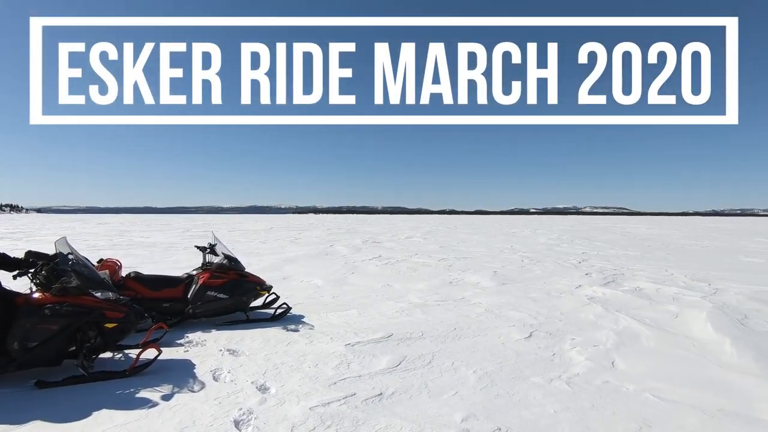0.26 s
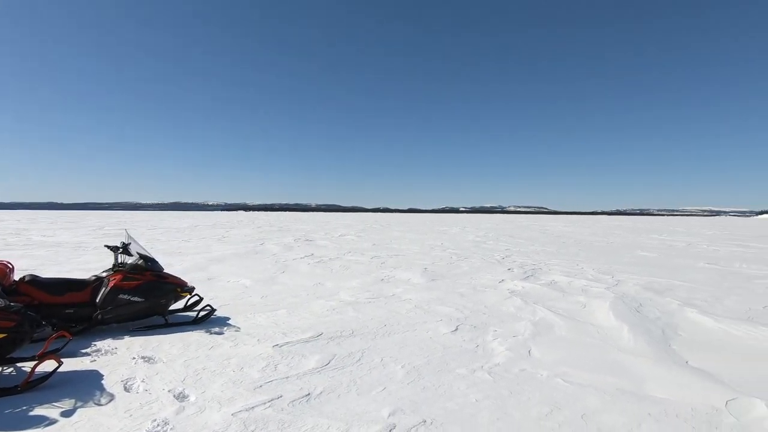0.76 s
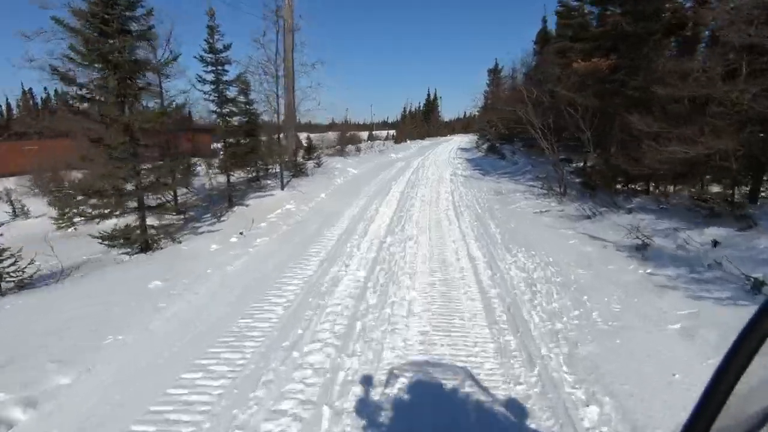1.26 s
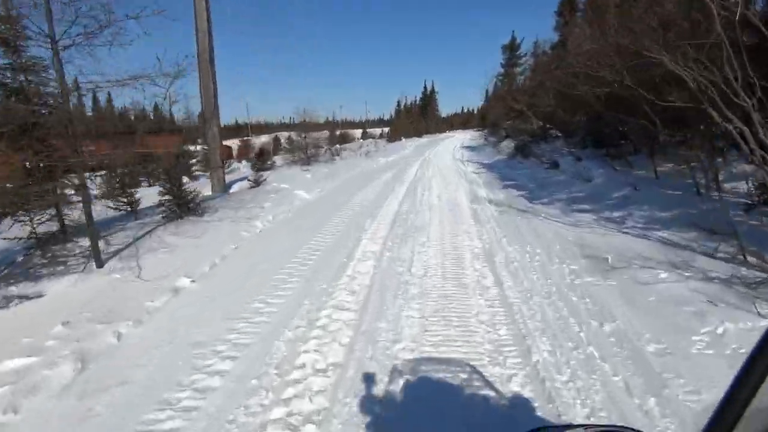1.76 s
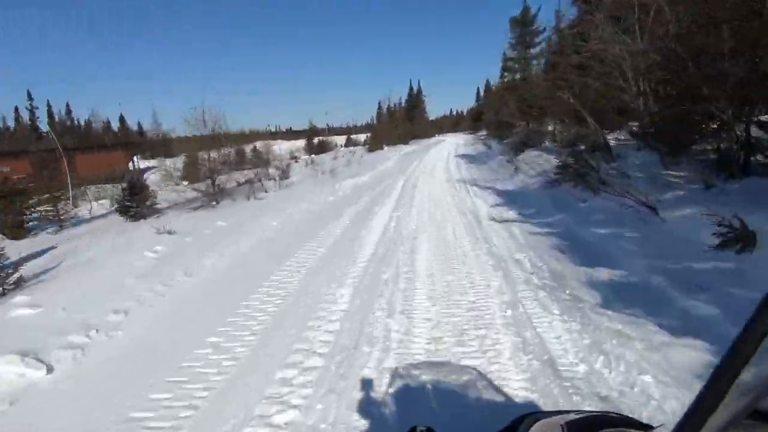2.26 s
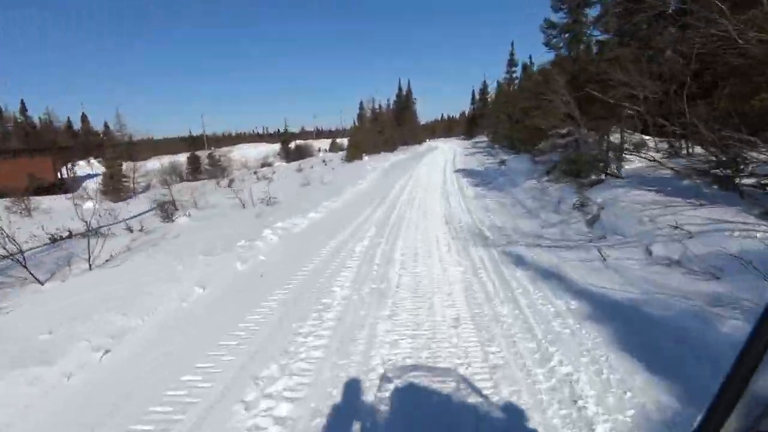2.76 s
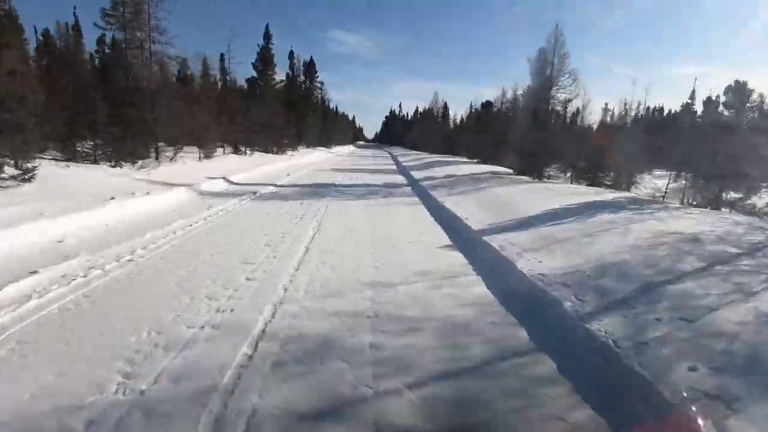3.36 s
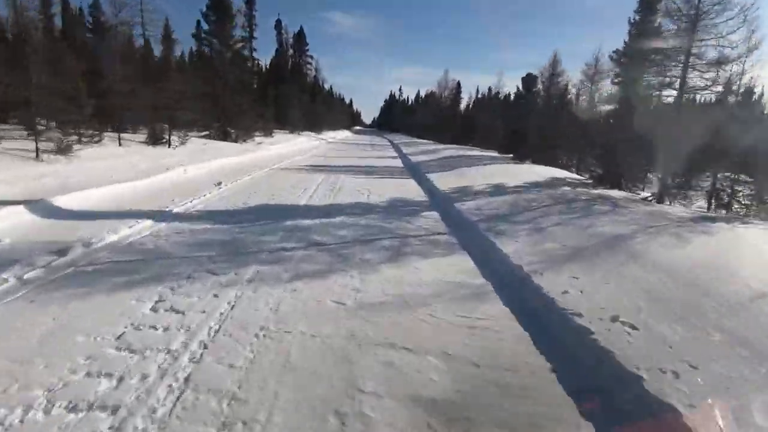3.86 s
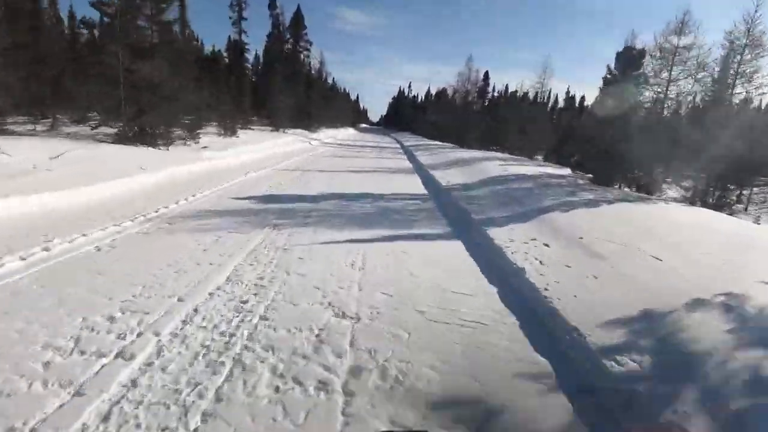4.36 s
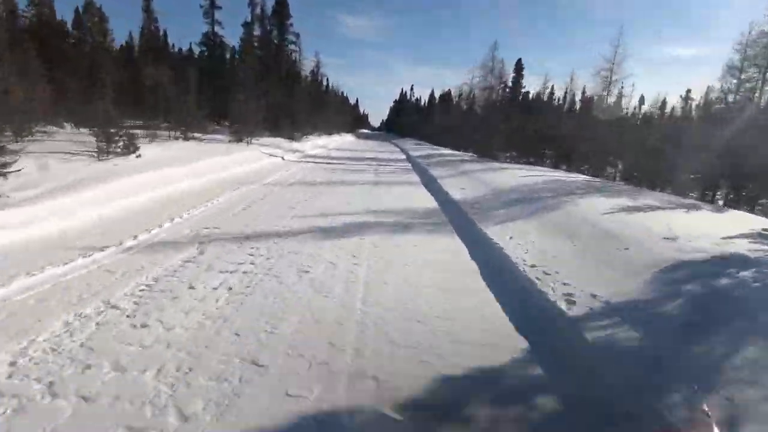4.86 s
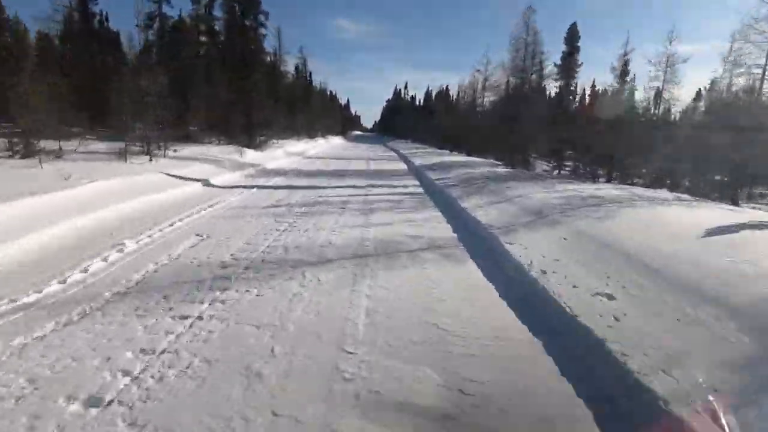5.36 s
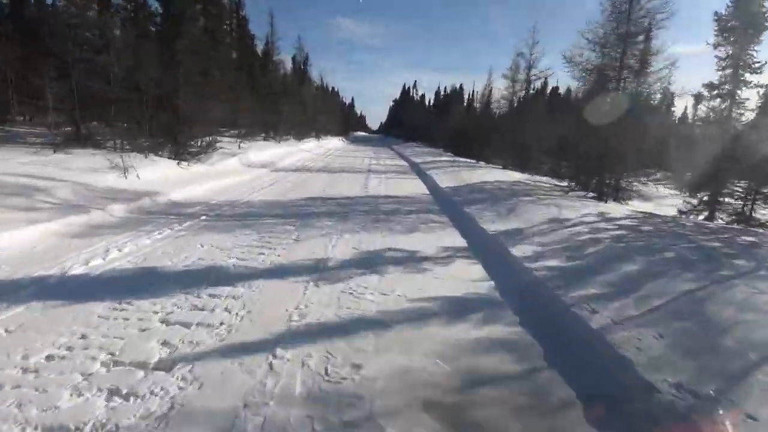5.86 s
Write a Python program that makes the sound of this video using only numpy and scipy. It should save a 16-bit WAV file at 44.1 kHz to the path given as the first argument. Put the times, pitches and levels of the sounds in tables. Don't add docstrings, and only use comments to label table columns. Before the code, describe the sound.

Snowmobiles idle with a soft puttering, cut off; then gusty wind buffets the microphone over a faint engine, before a loud full-speed engine drone with whine.

```python
import sys
import numpy as np
from scipy import signal
from scipy.io import wavfile
from scipy.ndimage import uniform_filter1d

SR = 44100
rng = np.random.default_rng(int(sys.argv[2]) if len(sys.argv) > 2 else 0)


def transcribe(signal):
    frames = np.atleast_2d(signal).T
    limited = np.clip(frames, -1, 1)
    pcm = np.round(limited * 32767).astype(np.int16)
    wavfile.write(sys.argv[1], SR, pcm)


def invert_db(x):
    u = np.asarray(x, float) / 20
    return 10 ** u


N = 269010
T = np.arange(N) / SR
CUT_S, FADE_S, JOIN_S = 1.0008, 1.08, 3.1672


def evened(x):
    return x / np.sqrt(np.mean(x ** 2) + 1e-20)


def curves(rows):
    s, *columns = np.transpose(rows)
    return [np.interp(T, s, c) for c in columns]


def above(x, hz):
    return signal.sosfiltfilt(signal.butter(4, hz, "high", fs=SR, output="sos"), x)


def steadied(x):
    flat = x / np.sqrt(uniform_filter1d(uniform_filter1d(x ** 2, size=150), size=150) + 1e-20)
    return flat - above(flat, 6600)


def wander(hz):
    lowpass = signal.butter(2, hz, fs=SR / 16, output="sos")
    coarse = signal.sosfilt(lowpass, rng.standard_normal(N // 16 + 2))
    return np.interp(np.arange(N) / 16, np.arange(len(coarse)), evened(coarse))


def noise(points, lo_hz, hi_hz, size=512, patchy_db=-4.5, flicker_db=7.0):
    hz, frames = np.fft.rfftfreq(size, 1 / SR), 4 * N // size + 5
    f, db = np.transpose(points)
    shape = invert_db(np.interp(np.log(hz + 1), np.log(f + 1), db))
    a, b, patch = rng.standard_normal((frames, len(hz), 3)).T
    patch = evened(uniform_filter1d(uniform_filter1d(patch, size=7, axis=0), size=9, axis=1))
    flicker = evened(uniform_filter1d(rng.standard_normal(frames), size=3))
    z = (a + 1j * b) * shape[:, None] * invert_db(patchy_db * patch + flicker_db * flicker)
    in_band = (hz >= lo_hz) & (hz <= hi_hz)
    share = np.sum(shape[in_band] ** 2) / np.sum(shape ** 2)
    return evened(signal.istft(z, nperseg=size, noverlap=3 * size // 4)[1][:N]) / np.sqrt(share)


def tone(hz, db, rough_db, rough_hz):
    turns = np.cumsum(hz * np.ones(N)) / SR + rng.random() + 0.018 * rough_db * wander(rough_hz)
    return np.sqrt(2) * invert_db(db + rough_db * wander(rough_hz)) * np.sin(2 * np.pi * turns)


def bursts(rows, rise):
    power = np.zeros(N)
    for s, db, length in rows:
        t = np.arange(0, 4 * length + rise, 1 / SR)
        puff = invert_db(db) * np.minimum(t / rise, 1) * np.exp(-(np.maximum(t - rise, 0) / length) ** 2)
        part = power[round(s * SR):][:len(t)]
        part += puff[:len(part)] ** 2
    return np.sqrt(power)


def whistle(t0, t1, hz0, hz1, width, db):
    u = np.clip((T - t0) / (t1 - t0), 0, 1)
    turns = 2 * np.pi * np.cumsum(hz0 + u * (hz1 - hz0)) / SR
    band = wander(width / 2) * np.cos(turns) + wander(width / 2) * np.sin(turns)
    swell = (np.abs(np.sin(np.pi * u ** 0.6)) + 1e-12) ** 0.46
    edges = np.clip((T - t0) / 0.0072, 0, 1) * np.clip((t1 - T) / .006, 0, 1)
    return invert_db(db) * swell * edges * band


def speeding_up(early, late):
    return early + np.clip((T - 3.9) / 2.0, 0, 1) * (late - early)


# time in seconds, engine cycles per second in Hz, load in dB.
ENGINE = [(3.17, 38.3, -9), (3.45, 38.5, 2), (4.0, 38.2, -3), (4.5, 38.5, 3), (4.8, 39.6, 0.5),
          (5.4, 39.1, 0.5), (5.75, 38.8, -0.5), (6.1, 37.8, -10.5)]
ORDER = [8, 9, 12, 16, 20, 21, 22, 23, 24, 26, 28, 30, 34, 37, 41, 48]
EARLY_DB = [-42.5, -48.5, -38.5, -50, -42, -51, -48, -37.5, -36.5, -52.5, -48.5, -58, -51, -39.5, -48.5,
            -51]
LATE_DB = [-55.5, -42.5, -42.5, -54, -40.5, -38.5, -39, -45.5, -58.5, -51, -51, -46.5, -68, -60, -51, -47]


def fast_engine(hz, load_db):
    engine = tone(2 * hz, speeding_up(-22.5, -20.5) + load_db, 1.55, 10)
    engine += tone(3 * hz, speeding_up(-20, -27.5) + load_db, 3.65, 8.6)
    for k, early, late in zip(ORDER, EARLY_DB, LATE_DB):
        engine += tone(k * hz, speeding_up(early, late), 2.75, 5.8)
    return engine


TRACK_ORDER = [1, 2, 3, 4, 6, 8]
# early level in dB, late level in dB.
TRACK_DB = [(-37.5, -32), (-33.5, -21.5), (-36, -25), (-61, -36), (-29, -35), (-35, -42)]


def track_drone(whine_hz):
    track_hz = whine_hz / 31.25
    levels = zip(TRACK_ORDER, TRACK_DB)
    return sum(tone(k * track_hz, speeding_up(early, late), 1.5, 11.0) for k, (early, late) in levels)


# time in seconds, whine in Hz, tension as level in dB.
WHINE = [(3.17, 1329, -32.5), (3.95, 1336, -43), (4.16, 1345, -29), (4.7, 1361, -32), (5.4, 1392, -29.5),
         (6.1, 1415, -29)]


def chain_whine(whine_hz, whine_db):
    overtone = tone(3 * whine_hz, whine_db - 33, 1.5, 15)
    return tone(whine_hz, whine_db, 0.72, 33) + np.clip((T - 5.75) / .1, 0, 1) * overtone


# frequency in Hz, level in dB per Hz.
RIDE = [(12, -45.5), (20, -42), (82, -4), (102, -1), (170, -10.5), (266, -5.5), (399, -16), (883, -15),
        (1250, -18), (1380, -15.5), (1530, -24.5), (1920, -25.5), (2600, -48), (3380, -68.5), (5720, -120)]


def body_roar(hz, start):
    throb = 1 + 0.13 * np.cos(2 * np.pi * np.cumsum(4 * hz) / SR)
    air = noise(RIDE, 450, 1250, size=1024, patchy_db=0.15, flicker_db=-0.8)
    return invert_db(-28.5 + 4.5 * start) * throb * air


# frequency in Hz, level in dB per Hz.
SPRAY = [(2000, -15.5), (3400, -13.5), (4300, -4.5), (5300, 3.5), (6300, -3), (7100, -16), (8700, -19.5),
         (9300, -27.5), (10800, -32), (11300, -58), (11800, -34.5), (12400, -35.5), (14000, -42),
         (15500, -52)]


def snow_spray(start):
    low = [p for p in SPRAY if p[0] < 11500]
    high = [p for p in SPRAY if p[0] > 11000]
    spray = noise(low + [(12000, -86)], 3500, 7000, size=512, patchy_db=-1.4, flicker_db=0.95)
    fizz = noise([(10900, -84)] + high, 11500, 15000, size=512, patchy_db=-1.0, flicker_db=2.5)
    packed = np.clip(np.minimum(T - 4.6, 5.55 - T) / .15 + .5, 0, 1)
    return invert_db(-45.5) * spray + invert_db(-74.5 + 10 * start - 7.5 * packed) * fizz


# time in seconds, peak level in dB.
TICKS = [(3.3777, -38), (3.458, -39), (3.694, -41), (3.8472, -42), (4.0612, -38), (4.137, -43),
         (4.2034, -37), (4.2784, -40), (4.345, -40), (4.4847, -36), (4.5497, -40), (4.6183, -36),
         (4.7706, -38), (5.0614, -40), (5.2996, -47), (5.652, -43), (5.8222, -39), (5.887, -38)]
# frequency in Hz, level in dB per Hz.
GRAIN = [(1200, -51), (2300, 0.5), (4000, -6.5), (6500, -18.5), (9000, -60.5)]


def ice_ticks():
    grain = steadied(noise(GRAIN, 2500, 3900, size=256))
    return bursts([(s, db - 4, .0028) for s, db in TICKS], .0018) * grain


# start and end in seconds, start and end pitch in Hz, width in Hz.
MOAN = (4.95, 5.15, 540, 530, 90)


def fast_ride():
    hz, load_db = curves(ENGINE)
    whine_hz, whine_db = curves(WHINE)
    start = np.exp(-np.maximum(T - JOIN_S, 0) / 0.4)
    machine = fast_engine(hz, load_db) + track_drone(whine_hz) + chain_whine(whine_hz, whine_db)
    return machine + body_roar(hz, start) + snow_spray(start) + ice_ticks() + whistle(*MOAN, -31.5)


# start in seconds, length in seconds, strength in dB over the lull, drift in dB.
GUSTS = [(1.148, .12, 3, 5.5), (1.281, 0.16, 12, -9), (1.432, 0.12, 12, -0.5), (1.546, 0.234, 9.5, -1.5),
         (1.804, 0.052, 5, -2.5), (1.86, 0.094, 5.5, -2), (2.088, 0.17, 1.5, 1), (2.25, .07, 9, -0.5),
         (2.314, 0.087, 9, -3.5), (2.411, 0.051, 7, -1), (2.533, 0.056, 7, -2), (2.767, 0.055, 6, 0),
         (2.829, 0.072, 6.5, 0), (2.965, 0.086, 9, -4.5), (3.081, 0.076, 6, 4.5)]


def gusts():
    db = np.zeros(N)
    for s, length, first_db, change_db in GUSTS:
        edges = np.clip(np.minimum(T - s, s + length - T) / 0.039 + .5, 0, 1)
        db += edges * (first_db + change_db * np.clip((T - s) / length, 0, 1))
    return db


# time in seconds, pressure on the housing in dB.
AIRSPEED = [(1.15, -19), (1.2, -19.5), (1.73, -14), (1.98, -18), (2.53, -15.5), (2.73, -21.5),
            (3.15, -18.5), (3.17, -28)]
# frequency in Hz, level in dB per Hz.
BUFFET = [(12, -40), (20, -12), (43, 0), (97, 1), (178, -7), (274, -8), (304, -11.5), (370, -16),
          (411, -32), (450, -25.5), (580, -48), (990, -120)]


def buffeting(buffet_db, gust):
    buffet = invert_db(buffet_db) * noise(BUFFET, 25, 200, size=2048, patchy_db=1.7, flicker_db=1.2)
    rustle_db = 0.36 * uniform_filter1d(gust - buffet_db - 24.5, size=3000)
    return buffet + above(buffet, 190) * (invert_db(rustle_db) - 1)


# frequency in Hz, level in dB per Hz.
ROAR = [(240, -42), (400, 5.5), (415, -4), (504, 1), (822, -3.5), (895, -3.5), (2240, -13.5), (4110, -31.5),
        (5720, -42), (7390, -48), (9610, -76), (16300, -120)]


def wind_roar(gust):
    flicker = invert_db(0.3 * wander(30) + 2.15 * wander(120))
    roar = flicker * noise(ROAR, 450, 1800, size=256, patchy_db=1.5, flicker_db=-0.5)
    top = above(roar, 2430)
    return invert_db(gust - 36) * (roar - top) + invert_db(1.62 * gust - 63) * evened(top)


# time in seconds, peak in dB, brightness in dB, length in seconds.
SLAPS = [(1.142, -20.5, -34, 0.0049), (1.18, -15, -29, 0.0056), (1.231, -16.5, -24, 0.0075),
         (1.302, -20, -29, 0.0097), (1.441, -20, -22, 0.007), (1.525, -22, -22, 0.0036),
         (1.558, -14, -24, 0.007), (1.612, -15, -18.5, 0.007), (1.675, -23, -18, 0.007),
         (1.722, -13, -23, 0.0027), (1.775, -12, -21.5, 0.0061), (1.813, -27, -9, 0.0065),
         (1.901, -22, -14.5, 0.0047), (1.929, -29, -8, 0.007), (1.984, -18, -25, 0.0048),
         (2.2, -21, -18, 0.0035), (2.27, -14, -22, 0.0085), (2.31, -15.5, -21, 0.0061),
         (2.361, -14, -18, 0.0062), (2.394, -12, -22, 0.007), (2.484, -23.5, -14, 0.011),
         (2.529, -18.5, -17, 0.007), (2.618, -16, -15, 0.0084), (2.709, -24, -16, 0.007),
         (2.746, -32, -21, 0.007), (2.839, -29, -23, 0.0038), (2.99, -11, -35, 0.007),
         (3.069, -23, -15, 0.01), (3.104, -19, -23, 0.005), (3.13, -10.5, -24, 0.007)]


def eddy_slaps(gust):
    eddy = noise(ROAR, 700, 4000, size=256, patchy_db=1.5, flicker_db=-5.0)
    edge = above(eddy, 1870)
    spit = steadied(evened(edge) + 0.65 * evened(above(edge, 3300)))
    thump = steadied(above(eddy - edge, 610))
    slaps = bursts([(s - .002, db - 6, n) for s, db, _, n in SLAPS], 0.0049) * thump
    slaps += bursts([(s, db + bright_db - 1.0, 0.73 * n) for s, db, bright_db, n in SLAPS], 0.0018) * spit
    place, size = rng.random((140, 2)).T
    when = FADE_S + (np.arange(140) + place) / 55
    small_db = -44 - 4.5 * np.log(size + 0.022)
    small = bursts([(s, db, 0.0021) for s, db in zip(when, small_db)], 0.003)
    return slaps + small * invert_db(0.97 * gust) * (steadied(eddy) + invert_db(-29) * spit)


# start and end in seconds, start and end pitch in Hz, width in Hz.
WHISTLES = [(2.545, 2.61, 1800, 1650, 350), (2.54, 2.7, 4100, 4400, 1300), (2.7, 2.95, 4000, 4900, 1100),
            (2.83, 2.9, 1900, 1800, 600), (1.64, 1.8, 2700, 3000, 800), (1.85, 1.93, 2900, 3000, 800),
            (3.05, 3.17, 4300, 5300, 1100), (2.3, 2.33, 1500, 1400, 400)]
WHISTLE_DB = [-29.5, -47, -47.5, -34.5, -42.5, -47.5, -48, -33]


def housing_whistles():
    return sum(whistle(*row, db) for row, db in zip(WHISTLES, WHISTLE_DB))


SLOW_ORDERS = [2, 3, 5, 6]
SLOW_DB = [-27, -31.5, -38, -34]


def slow_engine(buffet_db):
    load_db = 0.81 * (buffet_db + 18)
    return sum(tone(k * 51.6, db + load_db, 0.29, 11) for k, db in zip(SLOW_ORDERS, SLOW_DB))


# frequency in Hz, level in dB per Hz.
HISS = [(2500, -29), (3500, -8), (4500, -6), (5500, -3), (6500, -12), (7300, -20.5), (8800, -26.5),
        (9600, -34), (11000, -45.5), (16000, -50.5)]


def snow_hiss(gust):
    loose = np.clip((T - 2.3) / 0.011, 0, 1)
    hiss = noise(HISS, 3800, 7000, size=256, patchy_db=-1.0, flicker_db=2.1)
    return invert_db(-56 + 0.35 * gust + 3 * loose) * hiss


def slow_ride():
    gust = gusts()
    buffet_db = curves(AIRSPEED)[0] + 0.19 * (gust - 5)
    wind = buffeting(buffet_db, gust) + wind_roar(gust) + eddy_slaps(gust) + housing_whistles()
    return wind + slow_engine(buffet_db) + snow_hiss(gust)


# time in seconds, firings per second in Hz.
IDLE_HZ = [(0, 32.21), (.2, 31.45), (.36, 32.18), (.49, 33.54), (.61, 31.52), (.75, 33.14), (.9, 32.06),
           (1, 28.78)]


def idle_exhaust():
    lead, early = 600, 3000
    fired = np.diff(np.floor(.3344 + np.cumsum(curves(IDLE_HZ)[0]) / SR), prepend=0) * (T < 1.1)
    before = np.roll(fired, -2 * round(SR / IDLE_HZ[0][1]) + early)[:early]
    swing_db = -23 + 4 * np.minimum(T / .55, 1)
    level_db = np.pad(swing_db, (early, 0), "edge") + 1.2 * rng.standard_normal(N + early)
    fired = np.concatenate([before, fired]) * invert_db(level_db)
    t = (np.arange(8000) - lead) / SR
    puff = .72 * np.exp(-(t / .0015) ** 2) - .62 * np.exp(-((t - .0032) / .0017) ** 2)
    onset = 1 / (1 + np.exp(-(t + .006) / .0012))
    ring = .2 * np.cos(2 * np.pi * 64.5 * (t + .0016)) * np.exp(-(t + .009) / .06) * onset
    ring *= signal.windows.tukey(len(t), .1)
    uneven = fired * invert_db(1.4 * rng.standard_normal(N + early))
    exhaust = signal.oaconvolve(fired, puff) + signal.oaconvolve(uneven, ring)
    return above(exhaust[lead + early:][:N], 36)


# frequency in Hz, level in dB per Hz.
STILL = [(20, 1), (60, 13), (200, 1.5), (330, -8.5), (500, -22.5), (900, -28), (1500, -24), (2000, -31.5),
         (2350, -42.5), (3630, -50), (5430, -33.5), (7390, -54.5), (9600, -71.5), (16000, -110)]
# start in seconds, peak in dB, length in seconds.
BREEZE = [(0.0, -61, .05), (.112, -54, 0.017), (.145, -53, 0.018), (.32, -56, .012), (.352, -56, .01),
          (.43, -51, 0.013), (.46, -49, .015), (.53, -51, .012), (.775, -60, .015)]


def still_air():
    air = noise(STILL, 1000, 2100, size=1024, patchy_db=1.0, flicker_db=-1.8)
    far = above(air, 1000)
    breeze = above(air - far, 480)
    rumble = air - far - breeze
    breath = np.hypot(invert_db(-57 - 11 * T), bursts(BREEZE, .006))
    return invert_db(-67) * rumble + invert_db(1.5) * breath * breeze + invert_db(-65) * far


def scene():
    first = np.clip((CUT_S - T) / 0.0018, 0, 1)
    first += invert_db(-37.0) * np.clip((CUT_S + 0.022 - T) / 0.0062, 0, 1)
    third = np.clip((T - JOIN_S) / .002 + .5, 0, 1)
    second = np.clip((T - FADE_S) / 0.087, 0, 1) ** 1.53 * (1 - third)
    cut = invert_db(-37) * np.exp(np.minimum(T - CUT_S, 0) / .002) * (T < CUT_S)
    step = invert_db(-28) * np.exp(-np.maximum(T - JOIN_S, 0) / .0015) * (T >= JOIN_S)
    ends = np.clip(np.minimum(T, T[-1] - T) / .003, 0, 1)
    idle = idle_exhaust() + still_air()
    return (ends * (third * fast_ride() + second * slow_ride() + first * idle + cut + step))[None]


def roll_off(x):
    return signal.sosfilt(signal.butter(12, 15720, fs=SR, output="sos"), x)


def record(dry):
    top = 0.63
    return roll_off(top * np.tanh(dry / top))


dry = scene()
out = record(dry)
transcribe(out)
```